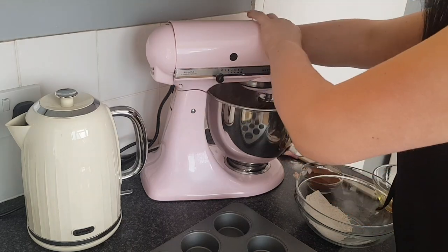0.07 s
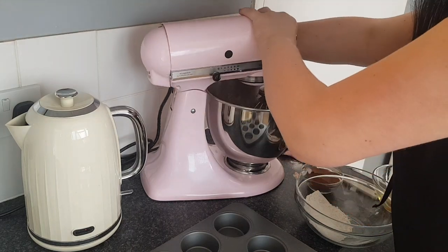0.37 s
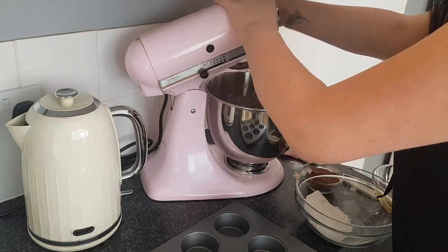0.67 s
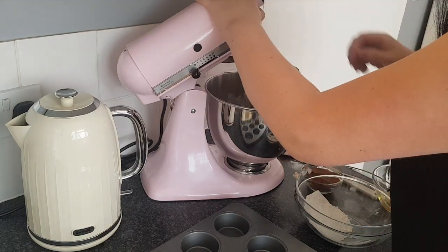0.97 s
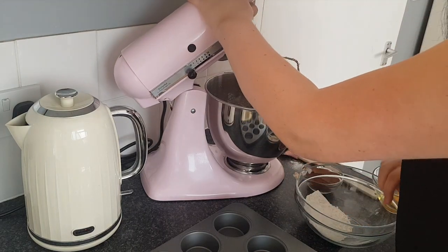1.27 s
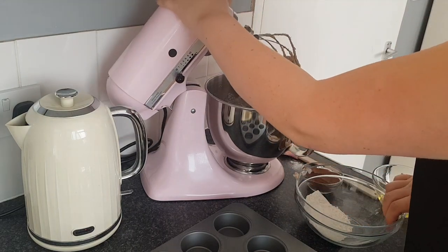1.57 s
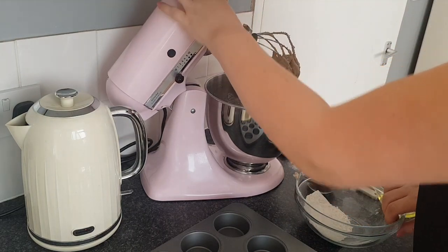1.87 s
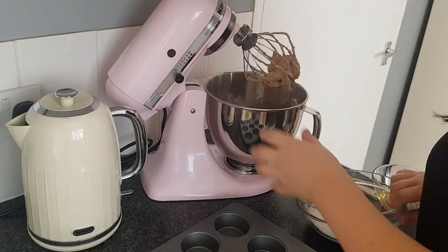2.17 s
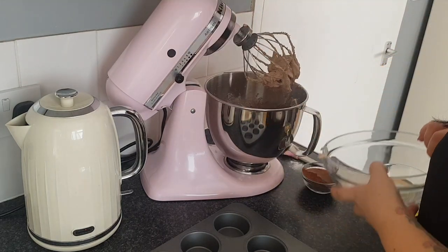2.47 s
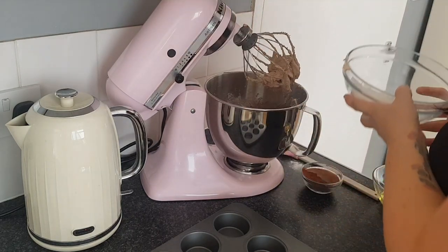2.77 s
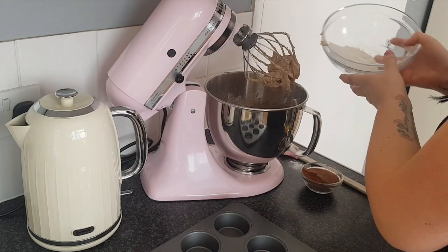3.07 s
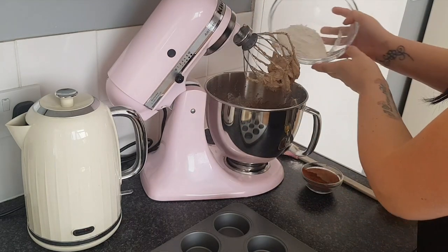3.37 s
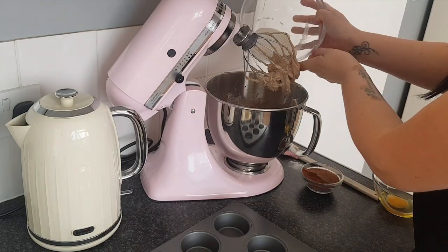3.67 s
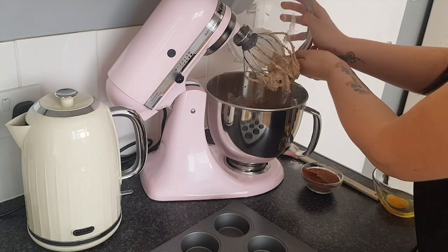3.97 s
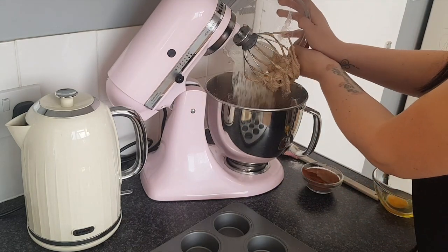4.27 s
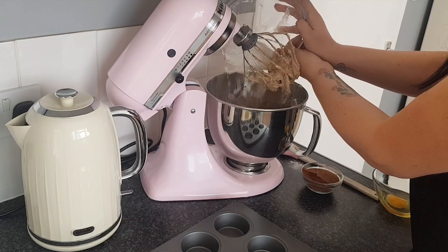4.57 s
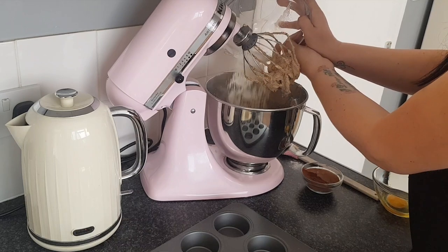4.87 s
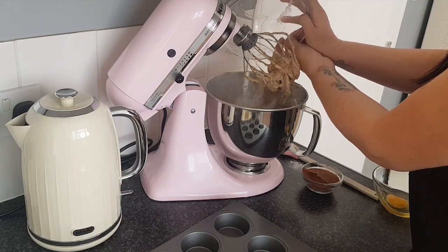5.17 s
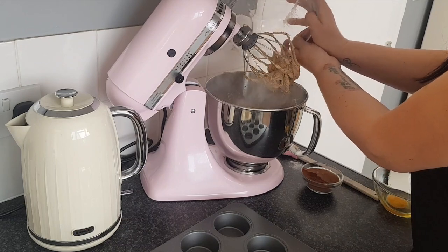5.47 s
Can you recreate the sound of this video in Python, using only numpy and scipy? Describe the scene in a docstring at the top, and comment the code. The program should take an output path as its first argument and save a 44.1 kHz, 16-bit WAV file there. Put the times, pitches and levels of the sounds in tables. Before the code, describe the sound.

A quiet, low appliance hum runs throughout in a small tiled kitchen with a short echo. At the start a hand slips faintly on a stand mixer's housing. At about 0.6 seconds the lock lever scrapes and catches twice, followed by two soft knocks and a dull hinge tick. At 1.6 seconds the tilting head hits its stop with a loud, bright metal clank, and the machine thumps heavily on the worktop. The head rocks to rest in quicker, softer, duller knocks with a slight rattle, ending around 2.3 seconds. From about 3 seconds flour hisses faintly out of a glass bowl in spurts, and soft clumps drop between 3.8 and 4.9 seconds, with tiny groans of glass on the whisk. Between 4.7 and 5.3 seconds the hand-muffled bowl knocks loudly against the whisk five times, two quick pairs and a final one, each ringing briefly.

```python
"""Stand mixer and flour

In a small tiled kitchen an appliance hums. A mixer's lock lever scrapes and its head is tilted back: metal
clanks on metal, the heavy machine thumps on the worktop, and it rocks on its feet to rest. Flour hisses out of
a glass bowl, which is knocked five times against the whisk to empty it. Each knock is a short burst of noise
plus ringing tones; each scrape is a hail of tiny slips."""
import sys
import numpy as np
from scipy import signal
from scipy.fft import rfft, irfft, next_fast_len
from scipy.io import wavfile

SR = 44100
rng = np.random.default_rng(int(sys.argv[2]) if len(sys.argv) > 2 else 0)


def store_pcm(level_fs):
    """Save levels as 16-bit WAV."""
    pcm = np.round(np.clip(level_fs, -1, 1) * 32767).astype(np.int16)
    wavfile.write(sys.argv[1], SR, np.atleast_2d(pcm).T)


N = 248283
TIME = np.arange(N) / SR
TAIL = TIME[:18000]   # time axis for one knock or echo

# Levels are relative. A decay_s or t60 is the time a sound takes to fade by 60 dB.
# how long the kitchen echoes: pitch_hz, decay_s
KITCHEN_DECAY = [(60, .3), (250, 0.23), (1000, 0.34), (2600, 0.4), (7000, .33), (15000, 0.24)]
# how alike left and right sound (1 is identical): pitch_hz, likeness
LIKENESS = [(100, 0.91), (250, .94), (550, 0.83), (1100, 0), (2500, 0.22), (6000, 0), (14000, 0.26)]
# tone colour of the air's murmur: pitch_hz, level_db
AIR_COLOUR = [(25, -21), (55, 7.5), (85, -1), (130, -5.5), (280, -8.5), (700, -13), (1100, -17.5),
              (1600, -25.5), (2500, -35), (3800, -41.5), (8500, -44.5), (12000, -36), (16000, -39.5)]
# loudness of that murmur: time_s, level_db
AIR_LEVEL = [(0, -53), (1, -56), (1.6, -52), (3.7, -56), (4.6, -49.5), (5.63, -52)]
# the appliance's tones: pitch_hz, level_db
HUM_TONES = [(64.6, -54), (97.5, -61.5), (247.6, -69), (296.1, -66), (527.6, -71.5), (726.7, -72.5)]
# loudness of the hum: time_s, level_db
HUM_LEVEL = [(0, 1), (2.6, 0.5), (3.15, -7), (3.9, -4), (4.3, 0.5), (5.63, 0)]

# a hand slips on the housing: start_s, level_db
HAND_SLIPS = [(0, -42), (.041, -45), (.061, -45.5), (.088, -44), (.137, -47.5), (.196, -50), (.267, -56)]
# the lock lever catches: start_s, level_db
LEVER_CATCHES = [(.5635, -31), (.598, -36)]
# tone colours of the hand and lever scrapes: pitch_hz, level_db
HAND_COLOUR = [(100, -3), (500, -32), (1000, 7), (2100, 13.5), (3200, 10.5), (5000, 7), (7800, 9.5),
               (9000, 1), (12000, 0.5), (16000, -12.5)]
LEVER_COLOUR = [(100, -10), (260, 9.5), (500, 4.5), (1000, -3), (2100, 2), (4100, 0.5), (5200, -1),
                (7500, -2), (9000, -9), (13500, -6), (16000, -20)]

# flow of flour out of the bowl, led in by a faint rustle: time_s, level_db
FLOUR_FLOW = [(2.2, -80), (2.8, -85), (3.05, -73.5), (3.75, -69.5), (4.4, -70.5), (5.0, -79), (5.35, -69),
              (5.63, -98)]
# brief brushes over the glass: start_s, length_s, peak_db
BRUSHES = [(2.65, 0.048, -77), (3.43, 0.1, -65.5)]
# tones of the glass under sliding flour: pitch_hz, level_db, decay_s
GLASS_TONES = [(1487, -2.5, 0.12), (2600, -1, 0.036), (3994, -2, 0.027), (5640, -8.5, 0.027),
               (7220, -9.5, 0.026), (9450, -11, 0.022)]
# clumps of flour land: start_s, level_db, treble_db
CLUMPS = [(3.796, -27.5, 0.5), (4.007, -27, 5), (4.04, -34, -4.5), (4.419, -27.5, -2), (4.567, -31, 1.5),
          (4.906, -18.5, -19)]
# tone colours of sliding flour and of a clump: pitch_hz, level_db
FLOUR_COLOUR = [(200, 14.5), (700, 18), (1200, -2), (2000, -7), (3200, -14), (4500, -2.5), (8000, -4),
                (12000, -6.5), (16000, -12)]
CLUMP_COLOUR = [(60, -21), (280, 4), (600, 1.5), (1400, -4), (2500, -14), (3200, -17), (4100, -7),
                (5200, -16), (10000, -20), (16000, -30)]
# the glass shifts on the whisk: start_s, level_db, pitch_hz
GROANS = [(4.426, -31, 2460), (4.44, -30.5, 1220), (4.559, -28, 1603), (4.944, -20.5, 285),
          (5.044, -13.5, 272)]
# the bowl hits the whisk: start_s, level_db, treble_db
BOWL_TAPS = [(4.727, 3.6, -3.5), (4.7984, 5.1, 1), (5.1023, 5.9, -11), (5.1495, 0.58, -5.5),
             (5.2886, 7.5, -3.5)]
# tones of the knocked bowl: pitch_hz, level_db, decay_s
BOWL_TONES = [(154, -20.5, 0.037), (251, -17, 0.081), (355, -28, 0.75), (445, -17, 0.17),
              (495, -5.5, 0.011), (580, -27, 0.097), (602, -7.5, 0.047), (701, -9.5, 0.043),
              (741, -7, 0.033), (882, -28, 0.17), (1040, -35, 0.017), (1460, -14, 0.053),
              (1550, -20.5, 0.043), (2553, -22, 0.063), (2640, -26.5, 0.026), (3250, -35, 0.069),
              (3995, -22, 0.029), (4190, -27, 0.14), (6460, -28.5, 0.052), (9400, -35, 0.09),
              (11660, -30, 0.06)]
# tone colour of its clatter: pitch_hz, level_db
BOWL_COLOUR = [(50, 0), (200, -2.5), (600, 12.5), (1000, 0), (1500, -6), (2000, -14.5), (3200, -7.5),
               (4100, -19), (4900, -11.5), (9000, -11), (16000, -28)]

# the hinge ticks and knocks as the head is lifted: start_s, level_db, treble_db
HINGE_TICKS = [(0.8765, -20, 0)]
LIFT_KNOCKS = [(0.703, -19.5, -16), (0.778, -23.5, -20)]
# the machine hits the worktop, the head hits its stop: start_s, level_db, treble_db
THUMPS = [(1.598, -7.5, -22), (1.6855, 13.5, -11), (1.7005, 3, 2.5), (1.741, 1, -12), (1.754, -2.5, 2)]
HEAD_CLANKS = [(1.6045, 9.5, -0.5), (1.6075, 5.5, -0.5)]
# the machine sways on its feet: start_s, length_s, peak_db
SWAYS = [(1.685, 0.24, -29.5), (1.93, 0.16, -36.5), (2.11, 0.19, -40.5)]
# ringing tones of the hinge, frame and head: pitch_hz, level_db, decay_s
HINGE_TONES = [(493, -2.5, 0.11), (1080, -9, 0.054), (1840, -17, 0.037), (2070, -17.5, 0.026)]
FRAME_TONES = [(88.8, -16.5, 0.25), (133.5, -7, 0.17), (206.6, -14, 0.31), (257.7, -7, 0.066),
               (363.7, -7.5, 0.15), (455, -14.5, 0.33), (495, -15, 0.084), (1056, -28, 0.53),
               (2393, -23, 0.064), (2620, -26, 0.14), (2900, -39, 0.123), (5500, -31, 0.031)]
HEAD_TONES = [(223, -24.5, 0.1), (362, -22, .2), (534, -18, .02), (506.7, -8, .25), (693, -20.5, .13),
              (1040, -28, 0.23), (1180, -32.5, 0.18), (3130, -27, .13), (3505, -27, 0.11),
              (3534, -18.5, 0.059), (4150, -22, 0.1), (5850, -24.5, 0.12), (6210, -14.5, .06),
              (7520, -18, .05), (12040, -24.5, 0.13), (12350, -26, .13), (13420, -24, .15)]
# tone colours of knocks on the hinge, frame, worktop and head: pitch_hz, level_db
HINGE_COLOUR = [(100, 16.5), (500, 5), (2100, -11), (2900, -25), (5000, -22), (9000, -38), (16000, -26)]
FRAME_COLOUR = [(30, -1), (100, 8.5), (260, 2), (500, -11), (800, -10.5), (1600, -16.5), (2600, -18),
                (3500, -18.5), (4600, -26), (8000, -28), (16000, -36.5)]
THUMP_COLOUR = [(30, -62.5), (70, -13), (115, -3), (170, 1.5), (245, 3.5), (310, -9.5), (450, -10.5),
                (750, -30.5), (1500, -27), (5000, -63.5)]
HEAD_COLOUR = [(60, -26), (200, -11), (700, 3), (1500, -2.5), (3300, 5), (4900, -2), (6500, 2.5),
               (8500, 3.5), (13000, 5), (16000, -6)]


def from_db(db):
    """Turn decibels into a gain."""
    return 10 ** (np.asarray(db) / 20)


def unit_energy(x):
    """Scale to an average energy of one per channel."""
    return x / np.sqrt(np.mean(np.sum(x ** 2, axis=-1)) + 1e-20)


def unit_rms(x):
    """Scale to an average power of one."""
    return x / np.sqrt(np.mean(x ** 2) + 1e-20)


def gain_curve(rows):
    """Join levels into a curve that fades to silence outside the rows."""
    times, levels = np.transpose(rows)
    outside_s = np.abs(TIME - np.clip(TIME, times.min(), times.max()))
    return from_db(np.interp(TIME, times, levels) - 600 * outside_s)


def swells(rows):
    """A rounded rise and fall for each row."""
    return sum(from_db(db) * np.sin(np.pi * np.clip((TIME - s) / length, 0, 1)) for s, length, db in rows)


def jerks(rows, attack_s, t60):
    """A quick rise and a steady fade for each row."""
    return sum(np.clip((TIME - s) / attack_s, 0, 1) * from_db(db - 60 * np.maximum(TIME - s, 0) / t60)
               for s, db in rows)


def wander(per_s):
    """A curve that drifts from one random value to the next."""
    return np.interp(TIME * per_s, np.arange(200), rng.standard_normal(200))


def at_hz(points, hz):
    """Look up a table's value at any pitch."""
    known_hz, values = np.transpose(points)
    return np.interp(np.log(hz + 1e-9), np.log(known_hz), values)


def through(x, response):
    """Let every sample of a sound set off a response (convolution)."""
    return signal.fftconvolve(np.atleast_2d(x), np.atleast_2d(response), axes=-1)[:, :N]


def pulse(colour):
    """The shortest click with this tone colour (minimum phase)."""
    size = len(TAIL)
    spectrum = from_db(at_hz(colour, np.fft.rfftfreq(size, 1 / SR)))
    cepstrum = irfft(np.log(spectrum))
    cepstrum[size // 2:] = 0   # nothing sounds before the click starts
    return unit_energy(irfft(np.exp(2 * rfft(cepstrum))))


def stereo_noise(size):
    """White noise whose two sides are alike in the bass and mostly unrelated in the treble."""
    alike = np.clip(at_hz(LIKENESS, np.fft.rfftfreq(size, 1 / SR)), -1, 1)
    mid, side = rfft(rng.standard_normal((2, size)))
    return irfft(np.sqrt(1 + alike) * mid + np.sqrt(1 - alike) * side * [[1], [-1]], size)


def slips(per_s, spread_db):
    """Friction: a random hail of tiny slips of uneven size."""
    sizes = from_db(spread_db * np.minimum(rng.exponential(1, N), 4))
    signs = rng.choice([-1, 1], N)
    return unit_rms(sizes * signs * (rng.random(N) < per_s / SR))


def ringing(tones, twin_detune=0.012):
    """Fading tones, each with a weaker, mistuned twin; high ones reach the two ears out of step."""
    sound, weights = 0, np.array([1, .35])
    for hz, db, t60 in tones:
        pair_hz = hz * (1 + twin_detune * rng.standard_normal() * np.array([0, 1]))
        scatter = 1 - np.clip(at_hz(LIKENESS, hz), 0, 1)
        phase = 2 * scatter * rng.standard_normal((2, 2))
        angle = 2 * np.pi * np.outer(pair_hz, TAIL)
        waves = (weights * np.cos(phase)) @ np.sin(angle) + (weights * np.sin(phase)) @ np.cos(angle)
        envelope = from_db(-60 * TAIL / t60) * np.minimum(TAIL * hz, 1)
        sound = sound + from_db(db) * unit_energy(waves * envelope)
    return sound


def clatter(click, t60):
    """A noise burst stands for a crowd of brief tones, too dense to tell apart."""
    burst = stereo_noise(len(TAIL)) * from_db(-60 * TAIL / t60)
    return unit_energy(through(burst, click)[:, :len(TAIL)])


def blows(rows, make_sound, treble_hz):
    """Place one sound at each blow; harder contacts carry more treble."""
    out = np.zeros((2, N + len(TAIL)))
    for s, db, treble_db in rows:
        sound, start = make_sound(), round(s * SR)
        bass = signal.lfilter(*signal.butter(1, treble_hz, fs=SR), sound)
        out[:, start:start + len(TAIL)] += from_db(db) * (bass + from_db(treble_db) * (sound - bass))
    return out[:, :N]


def struck(rows, tones, colour, clatter_db, clatter_t60, twin_detune, treble_hz):
    """A hard object answers each blow with a brief clatter and tones that ring on."""
    click = pulse(colour)

    def knock():
        noise = from_db(clatter_db) * clatter(click, clatter_t60)
        return unit_energy(noise + ringing(tones, twin_detune))
    return blows(rows, knock, treble_hz)


def kitchen(early_db, early_t60, build_s):
    """Early echoes from nearby surfaces, then a tail that fades at its own rate in each pitch band."""
    early = from_db(early_db - 60 * TAIL / early_t60)
    onset = 1 - np.exp(-(TAIL / build_s) ** 2)
    edges_hz = np.geomspace(20, 19000, 21)
    noises = stereo_noise(2 * len(TAIL)), stereo_noise(2 * len(TAIL))
    room = 0
    for k, (low, high) in enumerate(zip(edges_hz, edges_hz[1:])):
        band_filter = signal.butter(2, [low, high], "band", fs=SR, output="sos")
        band = signal.sosfilt(band_filter, noises[k % 2])[:, len(TAIL):]
        late = from_db(-60 * TAIL / at_hz(KITCHEN_DECAY, np.sqrt(low * high)))
        room = room + np.sqrt(2 * (high - low) / SR) * unit_energy(band * onset * (early + late))
    return room


def placed(dry, room, echo_db, left_db):
    """Direct sound plus its echoes, leaning left or right."""
    return (dry + from_db(echo_db) * through(dry, room)) * from_db([[left_db / 2], [-left_db / 2]])


def background(waver=0.14):
    """An appliance's wavering hum in the soft murmur of the air."""
    air = unit_rms(through(stereo_noise(next_fast_len(N)), pulse(AIR_COLOUR)))
    hum = 0
    for hz, db in HUM_TONES:
        flutter = 1 + waver * wander(per_s=8.0)
        tone = np.sin(2 * np.pi * (hz * TIME + rng.random()))
        hum = hum + from_db(db) * unit_rms(flutter * tone)
    return gain_curve(HUM_LEVEL) * hum + gain_curve(AIR_LEVEL) * air


def hand_scrape(level_db=-6.0, rub_db=-56.5, fade_db_per_s=45):
    """A hand slips on the housing in small jerks, over a light rub that fades."""
    grip = jerks(HAND_SLIPS, attack_s=0.0013, t60=0.059) + from_db(rub_db - fade_db_per_s * TIME)
    return through(from_db(level_db) * grip * slips(per_s=740, spread_db=-4.0), pulse(HAND_COLOUR))


def lever_scrape(start_s=.543, slide_s=.055, slide_db=-54):
    """The lock lever slides lightly and catches twice."""
    sliding = (TIME > start_s) & (TIME < start_s + slide_s)
    friction = from_db(slide_db) * sliding + jerks(LEVER_CATCHES, attack_s=0.0059, t60=0.06)
    return through(friction * slips(per_s=3700, spread_db=2.5), pulse(LEVER_COLOUR))


def sliding_flour(glass_db=-3.5, hiss_db=6.0, spurt_db=3, emptying_s=3.7, fade_db_per_s=1.5):
    """Powder hisses out in spurts; the glass sings faintly under it, less as it empties."""
    flow = gain_curve(FLOUR_FLOW) * from_db(spurt_db * wander(per_s=12))
    emptying = from_db(-fade_db_per_s * np.maximum(TIME - emptying_s, 0))
    rubbing = (flow * emptying + swells(BRUSHES)) * slips(per_s=6300, spread_db=-2.0)
    glass = through(rubbing, ringing(GLASS_TONES))
    hiss = through(flow * slips(per_s=22000, spread_db=2.5), pulse(FLOUR_COLOUR))
    return from_db(glass_db) * glass + from_db(hiss_db) * hiss


def flour_clumps(t60=0.085):
    """Clumps drop softly into the batter."""
    soft_start = 1 - from_db(-60 * TAIL / t60)
    click = pulse(CLUMP_COLOUR)
    return blows(CLUMPS, lambda: unit_energy(soft_start * clatter(click, t60)), treble_hz=1510)


def glass_groans(t60=0.025, rise_s=0.012):
    """Glass sticks and slips on the batter-coated whisk in short, faint groans."""
    out, size = np.zeros((2, N + len(TAIL))), len(TAIL)
    swell = TAIL * np.exp(-TAIL / rise_s)
    for s, db, hz in GROANS:
        start = round(s * SR)
        groan = through(rng.standard_normal(size) * swell, ringing([(hz, 0, t60)]))[:, :size]
        out[:, start:start + size] += from_db(db) * unit_energy(groan)
    return out[:, :N]


def bowl_taps(spot_db=2.5, grip_detune=.025):
    """The glass bowl, muffled by both hands, hits the whisk; spot and grip change each knock's tones."""
    out = 0
    for tap in BOWL_TAPS:
        chance = rng.uniform(-1.04, 1, (len(BOWL_TONES), 2))
        tones = [(hz * (1 + grip_detune * grip), db + spot_db * spot, t60)
                 for (hz, db, t60), (grip, spot) in zip(BOWL_TONES, chance)]
        out = out + struck([tap], tones, BOWL_COLOUR,
                           clatter_db=-12.0, clatter_t60=0.061, twin_detune=0.013, treble_hz=1120)
    return out


def hinge_tick():
    """The hinge gives a small dull tick on the way up."""
    return struck(HINGE_TICKS, HINGE_TONES, HINGE_COLOUR,
                  clatter_db=-2.5, clatter_t60=0.02, twin_detune=0.033, treble_hz=2500)


def settling_knocks(start_s=1.686, first_gap_s=.2325, shortest_gap_s=.034, gap_kept=.518):
    """The machine rocks to rest on its feet, ever sooner, softer and duller. Gives rows: start_s, level_db,
    treble_db."""
    rows, s = [], start_s
    for k in range(5):
        gap_s = shortest_gap_s + (first_gap_s - shortest_gap_s) * gap_kept ** k
        level_db, treble_db = 3.5 - 3.5 * k, 2 - 2.3 * k
        rows.append((s, level_db, treble_db))
        rows.append((s + .42 * gap_s, level_db - 12.5, treble_db - 6.0))   # a weaker rebound
        s += gap_s
    return rows


def rocking_machine(rattle_start_s=1.917, rattle_s=.32, rattle_db=-52.5):
    """The hinge knocks as the head is lifted; then the machine rocks on its feet against the worktop, ringing
    the metal frame, and rattles until it is at rest."""
    shaking = swells([(rattle_start_s, rattle_s, rattle_db)])
    rattle = through(shaking * slips(per_s=300, spread_db=3.0), pulse(FRAME_COLOUR))
    return rattle + struck(LIFT_KNOCKS + settling_knocks(), FRAME_TONES, FRAME_COLOUR,
                           clatter_db=-6.0, clatter_t60=0.068, twin_detune=0.034, treble_hz=900)


def worktop_thumps(sway_hz=51.5):
    """The machine's weight drops on the worktop, and it sways on its rubber feet."""
    sway = swells(SWAYS) * unit_rms(np.sin(2 * np.pi * sway_hz * TIME))
    thump = pulse(THUMP_COLOUR)
    return blows(THUMPS, lambda: thump, treble_hz=397) + sway


def head_clank():
    """Metal on metal: the head hits its stop and rings."""
    return struck(HEAD_CLANKS, HEAD_TONES, HEAD_COLOUR,
                  clatter_db=-2.5, clatter_t60=0.024, twin_detune=0.0023, treble_hz=3000)


def scene():
    """Mixer and flour echo off the tiles; the bowl taps also echo at once from the steel bowl below."""
    room = kitchen(early_db=0.5, early_t60=0.2, build_s=0.0025)
    over_bowl = kitchen(early_db=9.5, early_t60=0.058, build_s=0.0069)
    return (placed(head_clank(), room, echo_db=6.0, left_db=0.0)
            + placed(worktop_thumps(), room, echo_db=-10.0, left_db=1.0)
            + placed(rocking_machine() + hinge_tick(), room, echo_db=4.0, left_db=0.4)
            + placed(bowl_taps(), over_bowl, echo_db=1.0, left_db=-1.0)
            + placed(hand_scrape() + lever_scrape(), room, echo_db=5.5, left_db=0.5)
            + placed(sliding_flour() + flour_clumps() + glass_groans(), room, echo_db=2.5, left_db=-1.0)
            + background() * from_db([[.5], [-.5]]))


def record(dry):
    """Cut the deepest rumble and the very highest treble."""
    rumble_hz, top_hz = 22, 15900
    sound = signal.sosfilt(signal.butter(2, rumble_hz, "high", fs=SR, output="sos"), dry)
    return signal.sosfilt(signal.ellip(10, .1, 80, top_hz, fs=SR, output="sos"), sound)


dry = scene()
out = record(dry)
store_pcm(out)
```